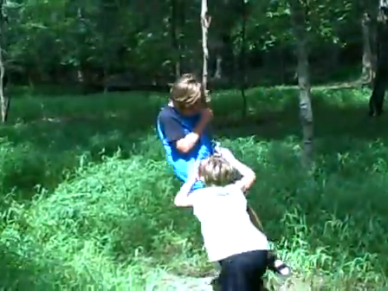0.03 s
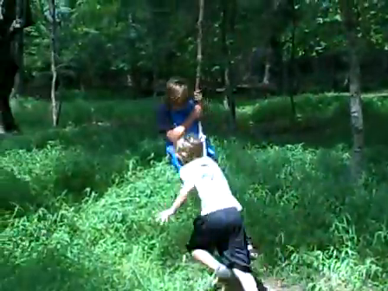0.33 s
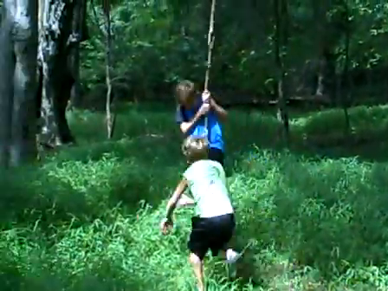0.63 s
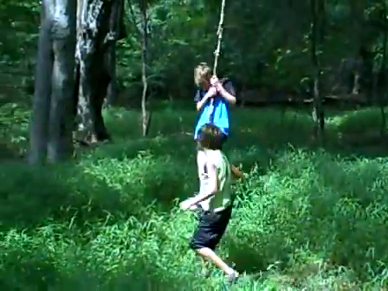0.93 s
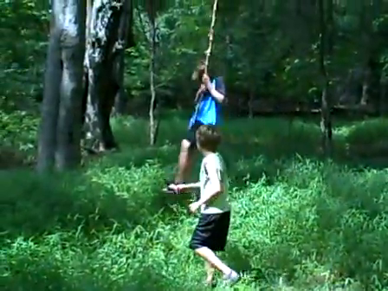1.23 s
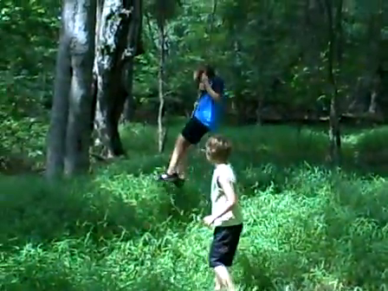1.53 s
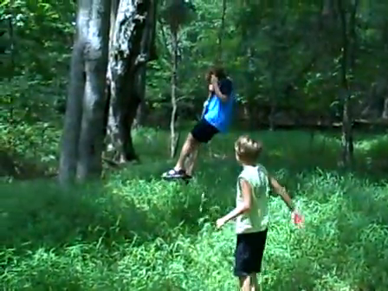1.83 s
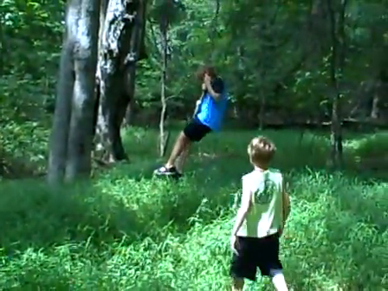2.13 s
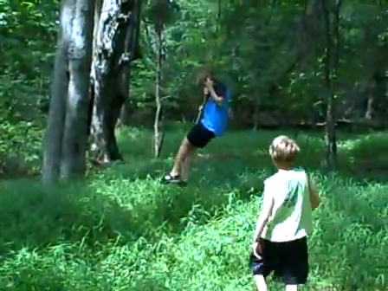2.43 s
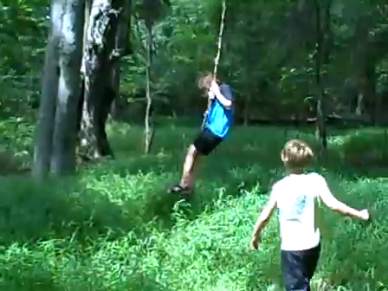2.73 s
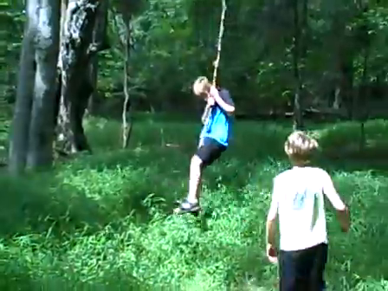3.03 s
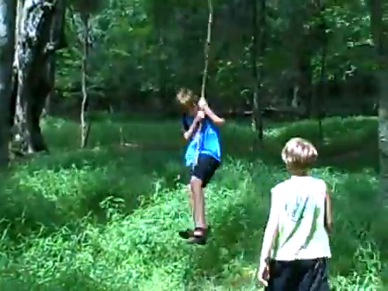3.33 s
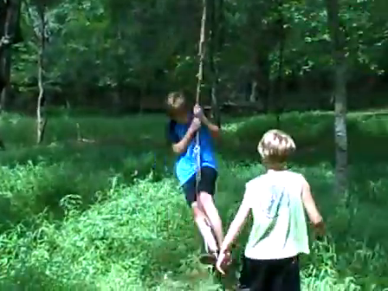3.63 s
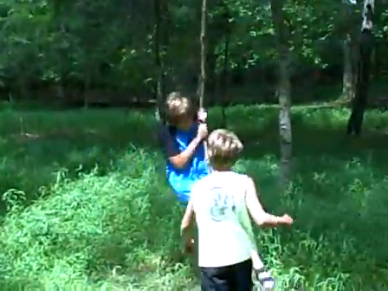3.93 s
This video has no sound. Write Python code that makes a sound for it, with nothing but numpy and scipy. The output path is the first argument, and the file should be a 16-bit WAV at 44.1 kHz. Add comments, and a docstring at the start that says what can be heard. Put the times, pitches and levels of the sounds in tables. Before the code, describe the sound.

A shrill, pulsing insect buzz, near and far, fills a woodland throughout. Two soft footfalls thump the soil nearby, followed by scattered grass rustles and stem snaps, while a grainy insect rasp rises and falls twice over a low rumble.

```python
"""Insects buzz in a summer wood: three near ones scrape their wings at their own stroke rates over a
far chorus, and a lower, grainy rasp swells twice. A child takes a few steps through tall grass: blades
brush, stems snap, and two footfalls thump the soil softly. A bird chips once, faintly.
A soft wash and a low rumble lie under everything."""
import sys
import numpy as np
from scipy import signal
from scipy.fft import rfft, irfft
from scipy.io import wavfile

SR = 44100
rng = np.random.default_rng(int(sys.argv[2]) if len(sys.argv) > 2 else 0)


def to_wav(s):
    """Save 16-bit WAV."""
    ch = np.atleast_2d(s).T  # columns
    pcm = np.round(np.clip(ch, -1, 1) * 32767)  # PCM
    wavfile.write(sys.argv[1], SR, pcm.astype(np.int16))


N = 176400
TIME = np.arange(N) / SR

# breaking-stem spectrum: f/Hz, level/dB
STEM_SPECTRUM = [(300, 0), (1200, -8), (3000, -2), (4500, -0.5), (6500, 3.5), (7500, -4.5), (9000, -25)]


def insects():
    """Three near insects scrape their wings over a far chorus."""
    # one wing stroke each: phase/cycle, f/Hz, level/dB
    buzz_stroke = [(0, 7300, -26), (.12, 7450, -14), (.21, 7690, -1), (.46, 7740, -1), (.57, 7580, -.5),
                   (.68, 7350, 0), (.77, 7270, -7), (.9, 7200, -24)]
    whirr_stroke = [(0, 7450, -20), (.12, 7430, -5), (.24, 7370, 0), (.4, 7130, 0), (.52, 7000, -8),
                    (.7, 6950, -28)]
    tick_stroke = [(0, 6950, -20), (.07, 7100, -6), (.15, 7220, 0), (.22, 7150, -3), (.3, 6880, -8),
                   (.4, 6750, -18), (.55, 6700, -35)]
    # tooth clicks against smooth ringing: phase/cycle, click share/1
    click_profile = [(.1, .5), (.25, .9), (.5, .9), (.65, .3), (1, .3)]
    # far chorus: f/Hz, level/dB
    chorus_spectrum = [(4500, -39), (5500, -20), (6000, -17.5), (6700, -11), (7000, -5), (7200, -6.5),
                       (7500, -1.5), (7720, -10), (7900, -4), (8150, -12.5), (8300, -7.5), (8450, -21.5),
                       (8700, -19.5), (9100, -48)]
    buzz_rate_hz, buzz_start_s = 48.12, .0085
    clicks = file_teeth(per_s=555, jitter=.12, ring_s=.00019, uneven_db=2, smear_rad=.35)
    buzz_cycle = ((TIME - buzz_start_s) * buzz_rate_hz) % 1
    click_share = np.interp(buzz_cycle, *np.transpose(click_profile))
    scrape = (click_share * clicks + 1 - click_share) * ringing(width_hz=70, rasp=.15, rasp_hz=900)
    buzz = amp(-37.6) * wing_strokes(buzz_stroke, scrape, buzz_rate_hz, buzz_start_s, uneven_db=.6)
    scrape = ringing(width_hz=130, rasp=.3, rasp_hz=700)
    whirr = amp(-42.5) * wing_strokes(whirr_stroke, scrape, rate_hz=44.24, start_s=.0075, uneven_db=1.2)
    scrape = ringing(width_hz=40, rasp=.2, rasp_hz=500)
    tick = amp(-42) * wing_strokes(tick_stroke, scrape, rate_hz=13.48, start_s=.0205, uneven_db=2)
    near = wood_echoes(buzz + whirr + tick, t60_s=.25, wet_db=-13)
    return near + amp(-40) * noise(chorus_spectrum)


def wing_strokes(stroke, scrape, rate_hz, start_s, uneven_db):
    """Each stroke carries the scrape through one glide of pitch and level."""
    # wings heard through undergrowth: f/Hz, gain/dB
    wing_response = [(5500, -24), (6700, -12), (7000, -3), (7250, 0), (7560, -.5), (7720, 2), (7900, -3),
                     (8100, -4), (8280, -.5), (8600, -5), (8850, -17), (9100, -38)]
    phase, hz, db = np.transpose(stroke)
    cycle = ((TIME - start_s) * rate_hz) % 1
    tone = carrier(np.interp(cycle, phase, hz))
    level = amp(np.interp(cycle, phase, db) + uneven_db * drift(rate_hz / 2).real)
    return unit(colour((tone * scrape).real * level, wing_response))


def file_teeth(per_s, jitter, ring_s, uneven_db, smear_rad):
    """Teeth of the wing's file catch at a nearly even pace; each rings briefly at its own size."""
    pace_hz = per_s * np.exp(jitter * drift(150).real)
    caught = np.diff(np.floor(np.cumsum(pace_hz) / SR), prepend=0)
    sizes = amp(uneven_db * rng.standard_normal(N))
    kicks = caught * sizes * np.exp(1j * smear_rad * rng.standard_normal(N))
    age = TIME[:400] / ring_s
    return unit(signal.fftconvolve(kicks, age * np.exp(-age))[:N])


def ringing(width_hz, rasp, rasp_hz):
    """Complex envelope of a sustained, wavering ring with a little rasp."""
    ring = drift(width_hz)
    return unit(ring / (abs(ring) + .5)) + rasp * drift(rasp_hz)


def wood_echoes(x, t60_s, wet_db):
    """Adds scattered echoes from trunks and leaves."""
    t = TIME[:SR // 2]
    tail = rng.standard_normal(len(t)) * amp(-60 * t / t60_s) * (t > .004)
    return x + amp(wet_db) * signal.fftconvolve(x, tail / np.linalg.norm(tail))[:N]


def swelling_rasp():
    """A lower, grainy rasp with narrow rings rises, holds and falls away twice."""
    # swells: top start/s, hold/s, level/dB
    swells = [(0.58, 0.21, -29.5), (1.906, 0.2, -30.5)]
    # rasp grains: f/Hz, level/dB
    rasp_spectrum = [(600, -17.5), (1500, -18.5), (3000, -18), (4200, -12.5), (5000, -13.5), (5250, -4),
                     (5450, -6), (5850, -2.5), (6100, -1), (6300, -2.5), (6700, -4), (7300, -2),
                     (8000, -25.5), (8900, -24.5)]
    # narrow rings: f/Hz, width/Hz, level/dB
    ring_bands = [(5445, 70, -17), (5750, 50, -12), (6020, 80, -17), (6560, 60, -19)]
    rise_db_per_s, fall_db_per_s = 38.5, 77
    level = sum(amp(db - rise_db_per_s * np.maximum(s - TIME, 0)
                    - fall_db_per_s * np.maximum(TIME - s - hold_s, 0)) for s, hold_s, db in swells)
    rings = sum(amp(db) * unit((np.exp(2j * np.pi * hz * TIME) * drift(width_hz / 2)).real)
                for hz, width_hz, db in ring_bands)
    rasp = .7 * grains(rasp_spectrum, per_s=6000, spread_db=3.5)
    flicker = amp(1.5 * drift(50).real)
    return level * (rasp + rings) * flicker


def footsteps():
    """Each foot thumps the soil, crunches stems and knocks hollowly; lighter scuffs follow."""
    # footfalls: t/s, thump/dB, thump f/Hz, crunch/dB, crunch half length/s, knock/dB
    steps = [(0.2706, -15, 186, -23.5, 0.0021, -37), (0.6263, -23, 179, -29.5, 0.0031, -30)]
    # shoe scuffs on soil: t/s, half length/s, level/dB
    scuffs = [(.636, 0.0028, -43), (0.799, 0.0032, -38), (1.02, 0.017, -46), (3.509, 0.0034, -39),
              (3.885, 0.0045, -41)]
    # knock and scuff spectra: f/Hz, level/dB
    knock_spectrum = [(130, -8), (310, -2), (470, -17), (720, 0), (950, 3), (1100, -11), (1500, -9),
                      (2200, -16), (5000, -35)]
    scuff_spectrum = [(80, 7), (200, 8), (450, -6), (750, -2), (1000, -5.5), (1500, -5.5), (3000, -35),
                      (6000, -26)]
    thump_peak_s, knock_half_s = .0015, .0056
    thump = 0
    for s, db, hz, *_ in steps:
        t = np.maximum(TIME - s, 0)
        envelope = t / thump_peak_s * np.exp(1 - t / thump_peak_s)
        thump += amp(db) * envelope * np.sin(2 * np.pi * hz * t)
    stems = grains(STEM_SPECTRUM, per_s=4000, spread_db=3)
    crunch = bursts([(s + .0037, half_s, db) for s, _, _, db, half_s, _ in steps]) * stems
    knock = bursts([(s + .0041, knock_half_s, db) for s, *_, db in steps]) * noise(knock_spectrum)
    return thump + crunch + knock + bursts(scuffs) * noise(scuff_spectrum)


def grass():
    """Blades brush and stems snap against the legs, over a faint constant rustle."""
    # brushes through grass: t/s, half length/s, level/dB
    brushes = [(.02, 0.032, -42.5), (.147, 0.0024, -28), (.251, .0018, -27.5), (.266, 0.017, -32),
               (.305, 0.014, -34), (.343, 0.0036, -31), (.54, 0.0024, -39), (.627, 0.015, -30),
               (.94, .05, -44.5), (1.0, 0.013, -34), (1.018, .005, -34), (1.05, 0.025, -41.5),
               (1.6, .03, -40), (1.614, 0.0027, -37), (2.125, 0.0032, -32), (2.292, .004, -37),
               (2.38, 0.18, -41.5), (2.575, 0.0036, -40), (2.632, 0.004, -46), (2.765, 0.022, -41),
               (2.88, 0.063, -43.5), (3.45, 0.19, -45.5), (3.845, .003, -34.5), (3.895, 0.064, -39)]
    # rubbing blades: f/Hz, level/dB
    blade_spectrum = [(400, -9), (1500, -8), (3000, -7), (4500, -3), (5600, 4), (6400, 7), (7200, 0.5),
                      (8200, -25.5), (9000, -40)]
    # snapping stems: t/s, level/dB
    stem_snaps = [(0.147, -43), (0.252, -38), (0.2771, -20), (0.3426, -30.5), (0.6291, -33), (1.016, -29),
                  (1.612, -29), (2.124, -31), (2.632, -34), (3.468, -37), (3.781, -31), (3.845, -33)]
    snap_half_s = .00076
    blades = grains(blade_spectrum, per_s=900, spread_db=4.5)
    rustle = amp(-51 + 2 * drift(7).real) * blades
    snaps = bursts([(s, snap_half_s, db) for s, db in stem_snaps]) * noise(STEM_SPECTRUM)
    brushing = bursts(brushes) * grains(blade_spectrum, per_s=9100, spread_db=4.5)
    return brushing + snaps + rustle


def bird():
    """One thin, distant chip."""
    # chip contour: t/s, f/Hz, level/dB
    chip = [(1.355, 5950, -52), (1.366, 6200, -39), (1.385, 6360, -38), (1.41, 6300, -45),
            (1.443, 6250, -42), (1.48, 6250, -60)]
    s, hz, db = np.transpose(chip)
    waver = ringing(width_hz=130, rasp=.5, rasp_hz=300)
    tone = unit((carrier(np.interp(TIME, s, hz)) * waver).real)
    return tone * amp(np.interp(TIME, s, db)) * (TIME > s[0]) * (TIME < s[-1])


def background():
    """Soft, flickering wash of the wood and a low rumble."""
    # wash and rumble spectra: f/Hz, level/dB
    wash_spectrum = [(82, -28), (140, -7), (163, 1), (204, -4), (238, -3.5), (422, -6.5), (469, -8),
                     (762, -7), (1030, -10.5), (1700, -13.5), (2070, -12.5), (4140, -13.5), (5200, -12.5),
                     (6760, -38), (11400, -120)]
    rumble_spectrum = [(10, -14), (22, -6), (32, -5), (47, -8), (56, -4), (64, .5), (74, -3), (88, -6),
                       (108, -4), (122, -13), (150, -24), (250, -45)]
    # rumble contour: t/s, level/dB
    rumble_level = [(0, -40.5), (.7, -36.5), (1.35, -40), (2.0, -37.5), (3.0, -37), (4.0, -37.5)]
    rumble = amp(np.interp(TIME, *np.transpose(rumble_level))) * noise(rumble_spectrum)
    wash = amp(-47 + 2.4 * drift(60).real) * noise(wash_spectrum)
    return wash + rumble


def amp(db):
    """Decibels to gain."""
    return 10 ** (np.asarray(db) / 20)


def unit(x):
    """Scales to rms 1."""
    return x / np.sqrt(np.mean(abs(x) ** 2) + 1e-20)


def carrier(hz):
    """Complex tone following a pitch curve."""
    return np.exp(2j * np.pi * np.cumsum(hz) / SR)


def colour(x, spectrum):
    """Filters by (f/Hz, gain/dB) points; 40 dB/decade roll-off past the ends."""
    hz, db = np.transpose(spectrum)
    f = np.fft.rfftfreq(2 * N, 1 / SR)
    curve_db = np.interp(np.log(f + 1), np.log(hz + 1), db)
    rolloff_db = 40 * np.log10(np.maximum(f / hz[-1], 1) * np.maximum(hz[0] / (f + 1), 1))
    return irfft(rfft(x, 2 * N) * amp(curve_db - rolloff_db))[:N]


def noise(spectrum):
    """Coloured noise, rms 1."""
    return unit(colour(rng.standard_normal(N), spectrum))


def drift(width_hz):
    """Low-passed complex noise, rms 1."""
    white = rng.standard_normal(N) + 1j * rng.standard_normal(N)
    return unit(np.fft.ifft(white * np.exp(-(np.fft.fftfreq(N, 1 / SR) / width_hz) ** 2)))


def grains(spectrum, per_s, spread_db):
    """Dense tiny snaps of uneven size, rms 1."""
    sizes = amp(spread_db * np.minimum(rng.exponential(1, N), 3.5)) * rng.choice([-1, 1], N)
    return unit(colour(sizes * (rng.random(N) < per_s / SR), spectrum))


def bursts(rows):
    """Bell-shaped envelopes summed in power; rows: t/s, half length/s, level/dB."""
    return np.sqrt(sum(amp(db) ** 2 * np.exp(-np.minimum(((TIME - s) / half_s) ** 2, 60))
                       for s, half_s, db in rows))


def scene():
    """All sources, mono."""
    return (insects() + swelling_rasp() + footsteps() + grass() + bird() + background())[None]


def record(dry):
    """Steep low-pass."""
    cutoff_hz = 8980
    lowpass = signal.firwin(601, cutoff_hz, window=("kaiser", 9), fs=SR)
    return signal.oaconvolve(dry, lowpass[None], "same")


dry = scene()
out = record(dry)
to_wav(out)
```